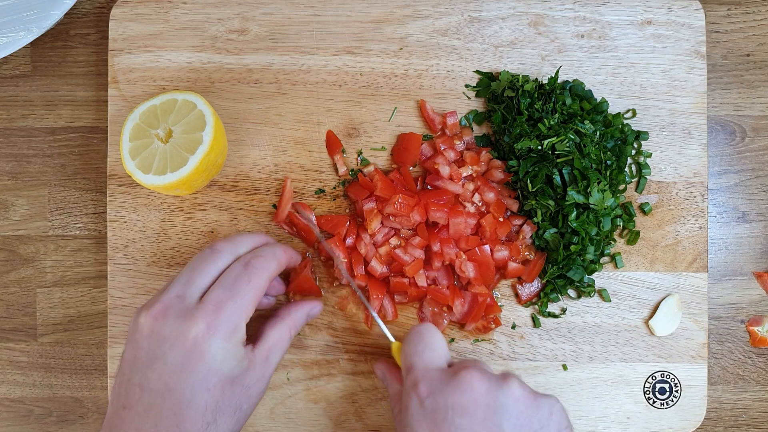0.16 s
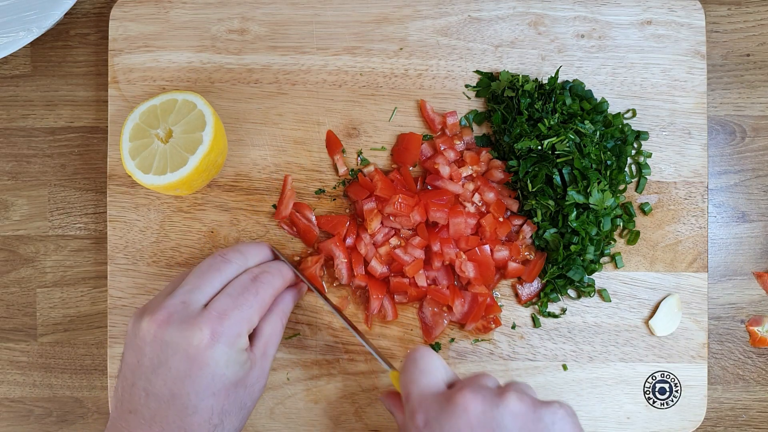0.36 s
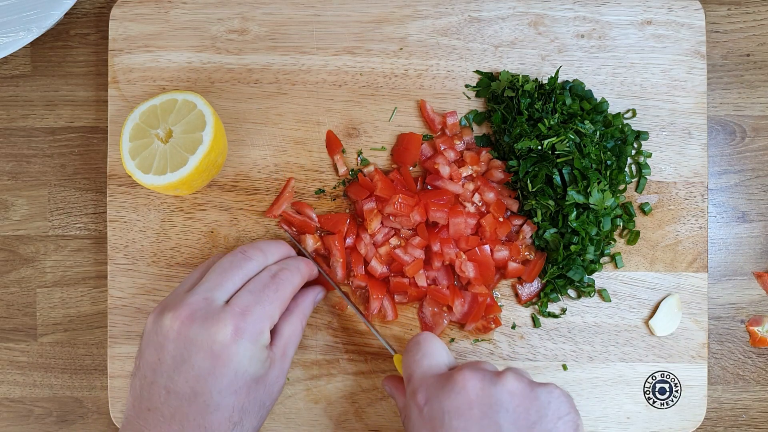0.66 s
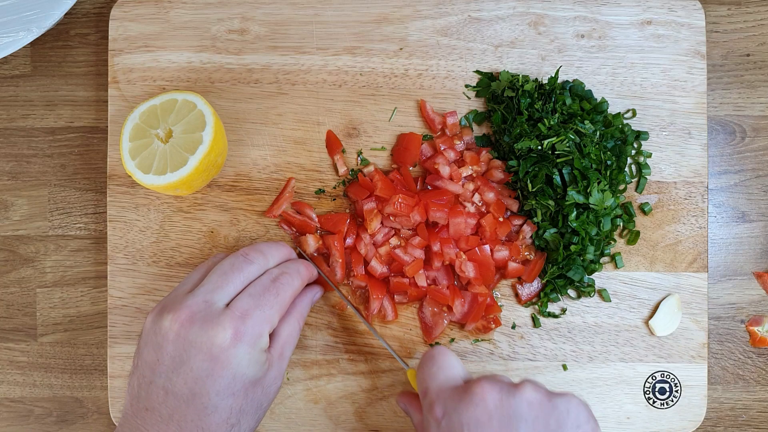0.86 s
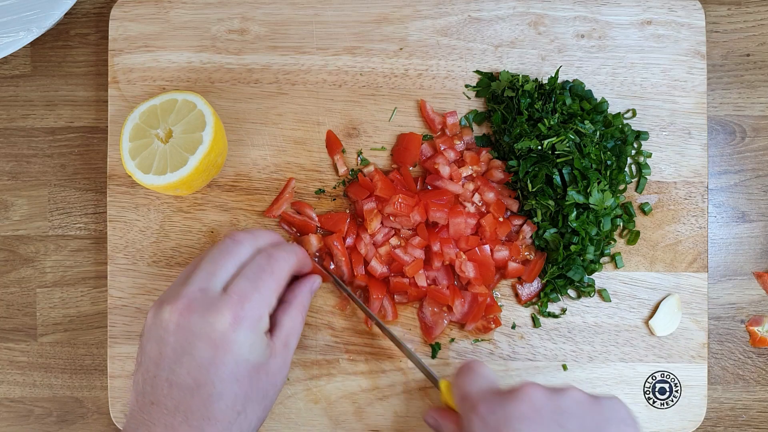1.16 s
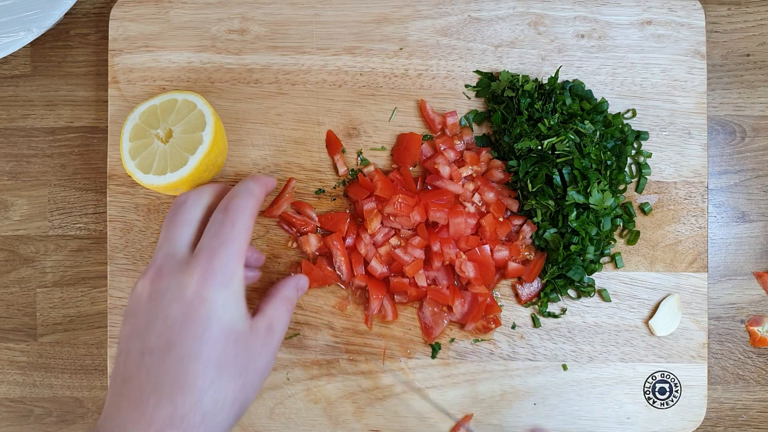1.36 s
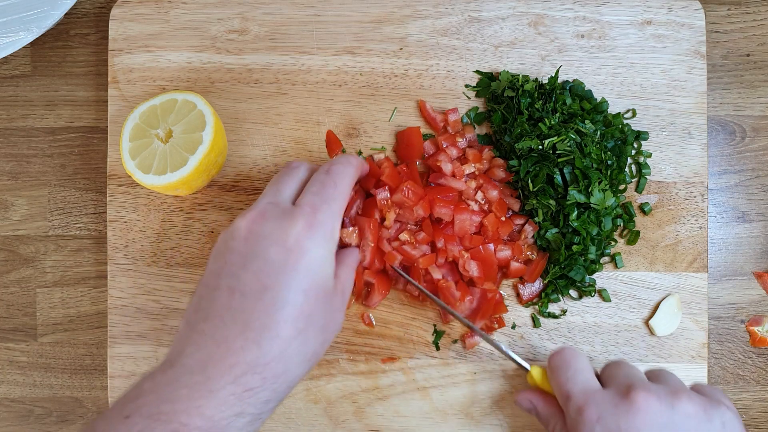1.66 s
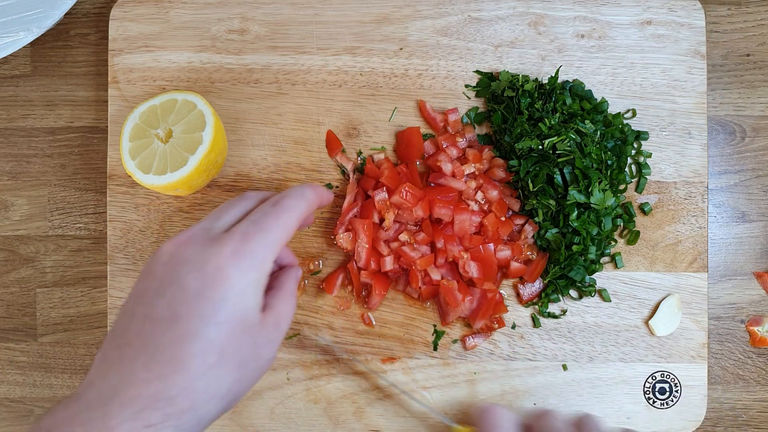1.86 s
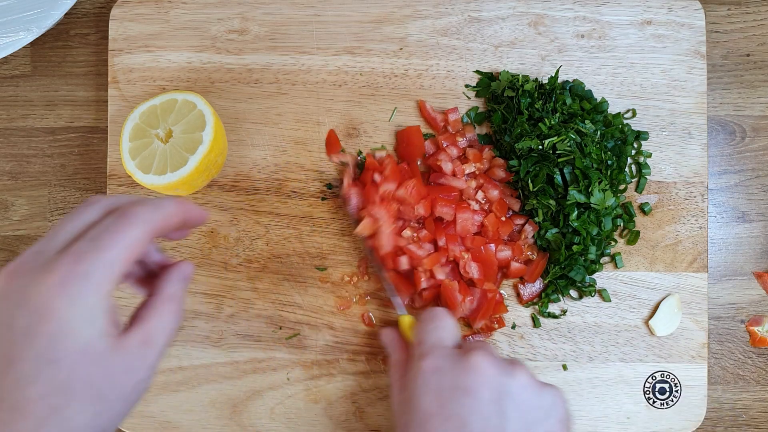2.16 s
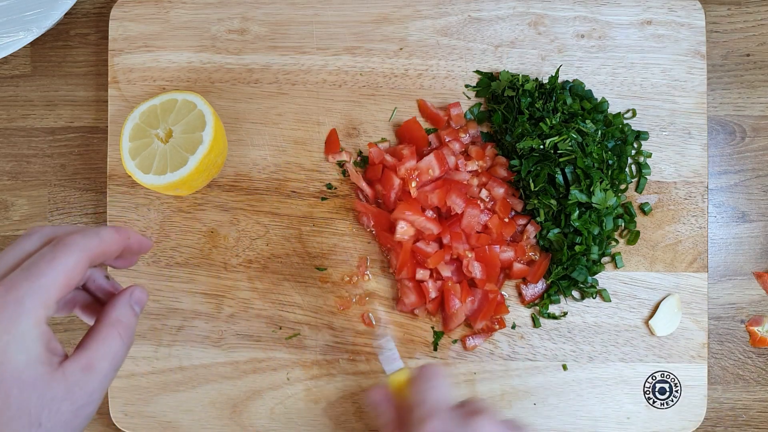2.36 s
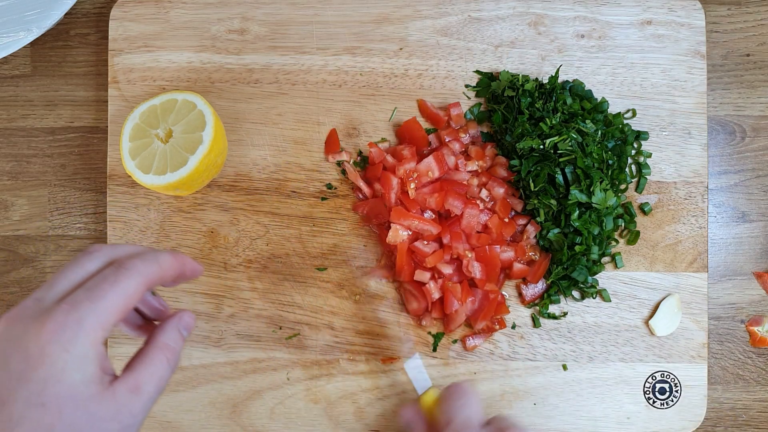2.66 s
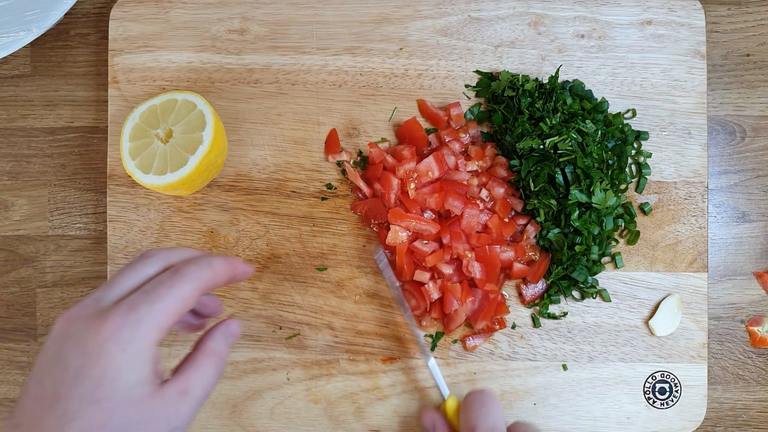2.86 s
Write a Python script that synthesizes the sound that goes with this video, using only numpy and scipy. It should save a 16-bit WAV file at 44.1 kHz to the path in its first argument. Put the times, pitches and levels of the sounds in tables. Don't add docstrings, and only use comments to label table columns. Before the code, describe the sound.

A small knife cuts tomato on a wooden board with soft wet snaps and two quick thuds, then rasping scrapes and hard knocks gather the dice; close stereo microphones in a small kitchen with faint hum.

```python
import sys
import numpy as np
from scipy import signal
from scipy.fft import rfft, irfft, next_fast_len
from scipy.io import wavfile
from scipy.ndimage import uniform_filter1d

SR = 44100
rng = np.random.default_rng(int(sys.argv[2]) if len(sys.argv) > 2 else 0)


def boost(x):
    u = np.asarray(x, float) / 20
    return 10 ** u


def to_wav(s):
    ch = np.atleast_2d(s).T
    pcm = np.round(np.clip(ch, -1, 1) * 32767)
    wavfile.write(sys.argv[1], SR, pcm.astype(np.int16))


N = 132300


def at_hz(points, hz):
    table = np.array(points)
    return np.interp(np.log(hz + 1), np.log(table[:, 0]), table[:, 1])


def rms_one(x):
    return x / np.sqrt(np.mean(x ** 2) + 1e-20)


def colour(x, gain_at):
    wide = np.concatenate([x[..., 4000:0:-1], x, x[..., :-4001:-1]], axis=-1)
    size = next_fast_len(wide.shape[-1])
    gain = gain_at(np.arange(size // 2 + 1) * SR / size)
    return irfft(rfft(wide, size) * gain, size)[..., 4000:4000 + x.shape[-1]]


def tinted(x, spectrum):
    power = boost(at_hz(spectrum, np.linspace(0, SR / 2, 4000))) ** 2
    return colour(x, lambda hz: boost(at_hz(spectrum, hz))) / np.sqrt(np.mean(power))


def filtered(x, order, hz, kind):
    return signal.sosfilt(signal.butter(order, hz, kind, fs=SR, output="sos"), x)


def ring(x, hz, t60):
    r, w = boost(-60 / (t60 * SR)), 2 * np.pi * hz / SR
    return signal.lfilter([0, np.sin(w)], [1, -2 * r * np.cos(w), r * r], x + 1e-18)


def body(x, modes):
    return sum((-1) ** k * boost(db) * ring(x, hz, t60) for k, (hz, db, t60) in enumerate(modes))


# frequency in Hz, likeness from 0 to 1.
LIKENESS = [(60, 0.96), (115, 0.97), (180, 0.63), (550, 0.38), (1650, 0.021), (4970, 0.011), (15000, 0.017)]


def diffuse(pair):
    likeness = lambda hz: np.clip(at_hz(LIKENESS, hz), -1, 1)
    mid = colour(pair[0], lambda hz: np.sqrt((1 + likeness(hz)) / 2))
    side = colour(pair[1], lambda hz: np.sqrt((1 - likeness(hz)) / 2))
    return np.array([mid + side, mid - side])


# frequency in Hz, density in dB per Hz.
VENTILATION = [(100, -26), (150, -5.5), (205, -5), (250, -17.5), (340, -10.5), (1400, -16.5), (1800, -25),
               (2400, -48.5)]
# frequency in Hz, density in dB per Hz.
HISS = [(1500, -25), (2300, 1), (3000, 0), (6000, -8), (9000, -20), (16000, -39)]
# frequency in Hz, width in Hz, level in dB.
RUMBLE = [(29.7, 8.6, -129), (52.8, 17.4, -53), (89.9, 47, -60)]
# frequency in Hz, level in dB.
HUM = [(100, -60), (200, -67.5), (300, -72), (400, -73), (602, -79.5)]
VENTILATION_DB, HISS_DB = -58.5, -84.5


def background():
    t = np.arange(N) / SR
    out = boost(VENTILATION_DB) * tinted(diffuse(rng.standard_normal((2, N))), VENTILATION)
    out = out + boost(HISS_DB) * tinted(rng.standard_normal((2, N)), HISS)
    for hz, width_hz, db in RUMBLE:
        noise = diffuse(rng.standard_normal((2, N)))
        resonance = lambda f: 1 / (1 + (2 * (f - hz) / width_hz) ** 2)
        out = out + boost(db) * rms_one(colour(noise, resonance))
    for hz, db in HUM:
        out = out + np.sqrt(2) * boost(db) * np.sin(2 * np.pi * (hz * t + rng.random()))
    return out


# start in seconds, level in dB, hardness as cut-off in Hz.
KNOCKS = [
    (0.002, -44.5, 635),
    (0.969, -35, 960),
    (1.099, -48.5, 1000),
    (1.133, -37.5, 1260),
    (1.452, -29.5, 1279),
    (1.942, -44.5, 1095),
    (2.479, -27, 1438),
    (2.745, -25.5, 2286),
]
# frequency in Hz, level in dB, t60 in seconds.
BOARD = [(99.5, -4.5, 0.28), (180, -5, 0.275), (312.6, -5, 0.21), (428, 1.5, 0.19), (678, -8.5, 0.29),
         (934, -6.5, 0.048), (1419, 5, 0.016), (1500, 8.5, 0.012), (1860, -23, 0.03)]
# frequency in Hz, density in dB per Hz.
CRACK = [(90, -6), (160, -10.5), (430, -11), (800, -7.5), (1500, -7.5), (2200, -15), (2850, -27),
         (4000, -16), (15000, -35.5)]
# frequency in Hz, t60 in seconds.
CRACK_T60 = [(150, 0.18), (600, 0.082), (2000, 0.35), (6000, 0.28), (15000, 0.043)]
CRACK_DB, LATE_CYCLES = -13, 0.16
THUD_DB, MODE_SPREAD_DB = 1, 1.3
BEND_DB, BEND_START_CUTS, BEND_HALF_S, BEND_T60_S = -2, 1.1, 0.0035, 0.045


def wood_crack(t, pair):
    edges = 120 * 2 ** np.arange(0, 7.1, 0.5)
    crack = 0
    for k, (low, high) in enumerate(zip(edges, edges[1:])):
        hz = np.sqrt(low * high)
        decay = boost(at_hz(CRACK, hz) - 60 * t / at_hz(CRACK_T60, hz))
        swell = np.clip(t * hz / LATE_CYCLES, 0, 1)
        crack = crack + filtered(pair[k % 2] * decay * swell, 2, [low, high], "band")
    return crack


def bending_wave(t, cut_hz):
    turns = BEND_START_CUTS * cut_hz * BEND_HALF_S * np.log(1 + t / BEND_HALF_S)
    return boost(BEND_DB - 60 * t / BEND_T60_S) * np.sin(2 * np.pi * turns)


def knocks():
    out, size = np.zeros(N + SR), SR // 2
    t = np.arange(size) / SR
    click = t == 0
    for s, db, cut_hz in KNOCKS:
        spread = MODE_SPREAD_DB * rng.standard_normal(len(BOARD))
        modes = [(hz, mode_db + d, t60) for (hz, mode_db, t60), d in zip(BOARD, spread)]
        crack = filtered(wood_crack(t, rng.standard_normal((2, size))), 1, 1.55 * cut_hz, "low")
        thud = filtered(click, 3, [cut_hz / 3, cut_hz], "band")
        wood = 0.22 * body(filtered(click, 1, 1.55 * cut_hz, "low"), modes)
        wood = wood - boost(THUD_DB) * thud / np.abs(thud).max()
        wood = wood - bending_wave(t, cut_hz)
        start = int(s * SR)
        out[start:start + size] += boost(db) * (boost(CRACK_DB) * crack / crack[:900].std() + wood)
    return out[:N]


# frequency in Hz, level in dB, t60 in seconds.
BLADE = [(1500, 2, 0.027), (1970, 4, 0.098), (2200, 12, .035), (2620, -15, 0.024), (3660, -3, 0.14),
         (3900, -19, .03), (5030, -15, 0.1), (5520, -6, 0.033), (6900, 9, 0.062)]
HELD_T60_S = 0.065
WANDER_DB, WANDER_PER_S = 3, 25
STROKE_EDGE_DB, STROKE_SQUARENESS = 24, 2.12
GRAINS_PER_S, GRAIN_SPREAD_DB = 5000, 3.5


def rubbed(x, modes):
    t, knots = np.arange(N) / SR, np.arange(0, N / SR + 1, 1 / WANDER_PER_S)
    out = 0
    for k, (hz, db, t60) in enumerate(modes):
        wander = np.interp(t, knots, rng.standard_normal(len(knots)))
        held = [(hz, db, min(t60, HELD_T60_S))]
        out = out + (-1) ** k * body(x * boost(WANDER_DB * wander), held)
    return out


def strokes(rows, spectrum, modes, blade_db):
    t = np.arange(N) / SR
    slips = boost(GRAIN_SPREAD_DB * np.minimum(rng.exponential(1, N), 5)) * rng.choice([-1, 1], N)
    slips = rms_one(slips * (rng.random(N) < GRAINS_PER_S / SR))
    edge, wood = np.zeros(N), np.zeros(N)
    for s, rise, fall, db, board_db in rows:
        distance = np.abs((t - s) / np.where(t < s, rise, fall))
        bell = boost(db - np.minimum(STROKE_EDGE_DB * distance ** STROKE_SQUARENESS, 200))
        edge += bell
        wood += bell * boost(board_db)
    unit = lambda modes: np.sqrt(np.mean(body(slips, modes) ** 2))
    in_air = tinted(slips * edge, spectrum)
    in_blade = boost(blade_db) * rubbed(slips * edge, BLADE) / unit(BLADE)
    in_board = rubbed(slips * wood, modes) / unit(modes)
    return in_air + in_blade + in_board


# peak in seconds, rise in seconds, fall in seconds, level in dB,
# board share in dB.
SLICES = [
    (0.01, 0.068, 0.12, -54.5, 2.5),
    (0.965, 0.051, 0.081, -46, 2.5),
    (1.105, 0.05, 0.1, -39.5, 1.5),
    (1.15, 0.052, 0.017, -64, -15),
    (1.54, 0.035, 0.047, -53, 2),
]
# frequency in Hz, density in dB per Hz.
SQUELCH = [(410, -56), (700, 2.5), (910, -24), (1400, -11), (2300, -18), (5690, -17), (7790, -29.5),
           (10300, -31.5), (16000, -44)]


def slices():
    return strokes(SLICES, SQUELCH, BOARD, blade_db=-13)


# start in seconds, level in dB, pitch in Hz, width in Hz.
SNAPS = [(0.045, -40, 3780, 1170), (0.548, -52, 5220, 2540), (0.566, -42.5, 5940, 2690),
         (0.595, -43, 5940, 2750), (0.624, -53.5, 5560, 1500), (0.875, -35.5, 5270, 2200),
         (0.953, -49, 4630, 3040), (1.527, -43.5, 7000, 10000), (1.559, -44.5, 3900, 900),
         (0.508, -72, 4500, 1500)]
SNAP_AIR_DB, SNAP_HISS_S, SNAP_TOP_HZ = -9.5, 0.012, 11500


def snaps():
    out, size = np.zeros(N + SR), 2000
    t = np.arange(size) / SR
    envelope = np.exp(-t / 0.00051) + 0.3 * np.exp(-t / SNAP_HISS_S)
    for s, db, hz, width_hz in SNAPS:
        noise = rng.standard_normal(size)
        edges = np.clip([hz - width_hz / 2, hz + width_hz / 2], 200, 19000)
        core = filtered(noise * envelope, 2, edges, "band")
        air = filtered(noise[::-1] * envelope, 1, [edges[0], SNAP_TOP_HZ], "band")
        snap = core / np.abs(core).max() + boost(SNAP_AIR_DB) * air / np.abs(air).max()
        start = int(s * SR)
        out[start:start + size] += boost(db + 4.5) * snap
    return out[:N]


# peak in seconds, rise in seconds, fall in seconds, level in dB,
# board share in dB.
SETTLES = [
    (0.12, 0.028, 0.12, -68.5, -22),
    (0.64, 0.04, 0.026, -78.5, -18),
    (0.93, 0.046, 0.11, -48, -24),
    (0.958, 0.015, 0.022, -41, -26),
    (2.22, 0.058, 0.24, -75, -20),
    (2.84, 0.051, 0.22, -81, -14),
    (1.6, 0.041, 0.14, -71, -1),
    (2.33, 0.18, 0.4, -76.5, -11),
    (2.95, 0.076, .2, -71.5, -19),
]
# frequency in Hz, density in dB per Hz.
JUICE = [(1530, -25), (2600, -1.5), (4630, 2.5), (6190, 0), (7480, -4.5), (9760, -14), (16000, -27)]


def settles():
    return strokes(SETTLES, JUICE, BOARD[:1], blade_db=-34)


# peak in seconds, half length in seconds, level in dB,
# mode in Hz.
CHATTERS = [(0.931, 0.09, -50.5, 134), (0.976, 0.025, -41, 430), (1.103, 0.054, -45.5, 678),
            (1.12, 0.11, -48.5, 97), (1.134, 0.046, -45.5, 301), (1.466, 0.027, -41.5, 165),
            (1.47, 0.017, -40.5, 428), (2.026, 0.072, -41, 690), (2.037, 0.06, -44.5, 415),
            (2.091, 0.017, -32.5, 428), (2.094, 0.03, -38, 1970), (2.135, 0.039, -40.5, 396),
            (2.528, 0.014, -33, 2276), (2.536, 0.025, -34.5, 428), (2.551, 0.012, -38.5, 428),
            (2.577, 0.004, -35, 426), (2.545, 0.03, -36, 3900), (2.556, 0.04, -33, 5080),
            (2.56, 0.011, -32, 1550), (2.587, 0.0098, -35, 2160), (2.791, 0.015, -30, 2110),
            (2.794, 0.015, -44, 3400), (2.795, 0.011, -34, 1450)]
CHATTER_CYCLES = 79


def chatters():
    t, noise = np.arange(N) / SR, rng.standard_normal(N)
    out = 0
    for s, half, db, hz in CHATTERS:
        bell = boost(-np.minimum(20 * ((t - s) / half) ** 2, 200))
        tone = ring(noise * bell, hz, np.clip(CHATTER_CYCLES / hz, 0.025, 0.06))
        out = out + boost(db) * tone * np.linalg.norm(bell) / np.linalg.norm(tone)
    return out


# peak in seconds, rise in seconds, fall in seconds, level in dB,
# board share in dB.
SCRAPES = [
    (2.02, 0.056, 0.036, -39, -1),
    (2.085, 0.076, 0.1, -33.5, -1.5),
    (2.145, 0.048, 0.046, -38.5, -44),
    (2.53, 0.024, 0.042, -29, -2),
    (2.575, 0.034, 0.023, -30, -40),
    (2.66, 0.031, 0.12, -56, 0),
    (1.97, 0.034, 0.033, -63.5, 21),
    (2.795, 0.04, 0.047, -34, -2.5),
]
# frequency in Hz, density in dB per Hz.
RASP = [(290, -21), (500, -27), (562, -12), (1230, -11), (2160, -3.5), (3110, -9), (5090, -13),
        (7640, -15.5), (16000, -28)]
SCRAPE_LOW_HZ = 285


def scrapes():
    return filtered(strokes(SCRAPES, RASP, BOARD[2:], blade_db=-11.5), 3, SCRAPE_LOW_HZ, "high")


# start in seconds, level in dB, length in seconds.
PINGS = [
    (2.615, -67, .02),
    (2.82, -52, 0.019),
    (2.85, -48.5, 0.082),
]
# frequency in Hz, level in dB, t60 in seconds.
FREE_BLADE = [(1414, -8, 0.25), (2200, -4, 0.56), (2225, -4, 0.15)]


def pings():
    out, t = np.zeros(N + SR), np.arange(SR // 2) / SR
    ringing = body(1.0 * (t == 0), FREE_BLADE)
    for s, db, length in PINGS:
        start = int(s * SR)
        out[start:start + len(t)] += boost(db - 3000 * np.clip(t - length, 0, 1)) * ringing
    return out[:N]


KITCHEN_T60_S, KITCHEN_DB, EARLY_T60_S, EARLY_DB = 0.18, -12.5, 0.033, 1
WALL_CUT_HZ, EAR_LAG_S, DIRECT = 16500, 0.0002, 0.63


def echoes():
    t = np.arange(SR // 2) / SR
    early, late = rng.standard_normal((2, 2, len(t)))
    early = early * boost(-60 * t / EARLY_T60_S)
    late = filtered(late, 2, WALL_CUT_HZ, "low")
    late = late * boost(-60 * t / KITCHEN_T60_S) * np.clip(t / 0.027, 0, 1)
    echo = boost(EARLY_DB) * early / np.linalg.norm(early[0])
    echo = echo + boost(KITCHEN_DB) * late / np.linalg.norm(late[0])
    echo = diffuse(echo) * (t > EAR_LAG_S)
    arrivals = (rng.random(2) * 2 * EAR_LAG_S * SR).astype(int)
    echo[[0, 1], arrivals] += DIRECT
    for _ in range(3):
        lines = rfft(echo, SR)
        smooth = uniform_filter1d(np.abs(lines) ** 2, size=20)
        echo = irfft(lines / np.sqrt(smooth), SR)[:, :len(t)]
    return echo


# frequency in Hz, left minus right in dB.
PAN = [(70, -12), (130, 3.5), (330, -12.5), (600, 0), (1300, 2), (2400, 2.5), (8000, 2.5), (15000, 1.5)]
SPOT_S = 0.045


def kitchen(x, count=4):
    step = np.arange(N) / SR / SPOT_S
    wet = 0
    for k in range(count):
        distance = np.abs((step - k + count / 2) % count - count / 2)
        share = np.sqrt(np.clip(1 - distance, 0, 1))
        wet = wet + signal.fftconvolve((x * share)[None], echoes(), axes=1)[:, :N]
    left = colour(wet[0], lambda hz: boost(at_hz(PAN, hz) / 2))
    right = colour(wet[1], lambda hz: boost(-at_hz(PAN, hz) / 2))
    return np.array([left, right])


NEAR_DB, CHATTER_ROOM_DB, CHATTER_NEAR_DB = -5, -7, -2


def scene():
    blows, catching = knocks(), chatters()
    cutting = slices() + snaps() + settles()
    scraping = boost(CHATTER_ROOM_DB) * catching + scrapes()
    opposed = boost([[1.5], [-1.5]])
    near = boost(NEAR_DB) * blows + (pings() + boost(CHATTER_NEAR_DB) * catching) * opposed
    return kitchen(blows + cutting + scraping) + near + background()


def roll_off(x):
    return signal.sosfilt(signal.butter(12, 16290, fs=SR, output="sos"), x)


CASE_NOTCH_HZ, CASE_NOTCH_WIDTH_HZ, CASE_NOTCH_DB, TOP_HZ = 7585, 1010, -7, 15780


def record(dry):
    def case(hz):
        notch = 1 / (1 + (2 * (hz - CASE_NOTCH_HZ) / CASE_NOTCH_WIDTH_HZ) ** 2)
        return boost(CASE_NOTCH_DB * notch) * (hz < TOP_HZ)
    return roll_off(colour(dry, case))


dry = scene()
out = record(dry)
to_wav(out)
```